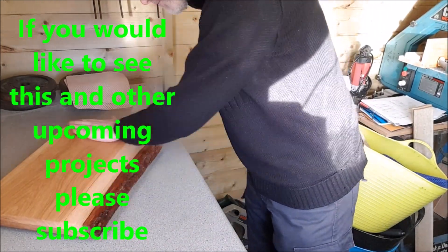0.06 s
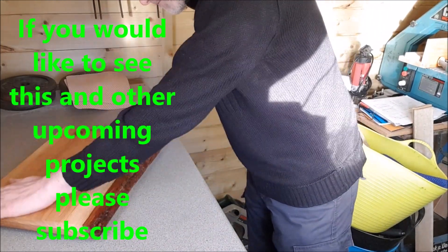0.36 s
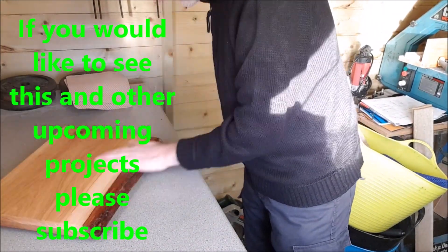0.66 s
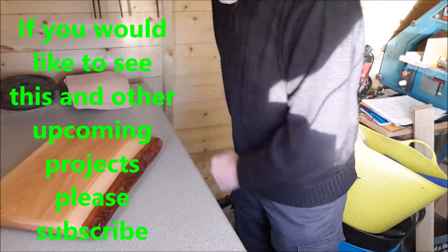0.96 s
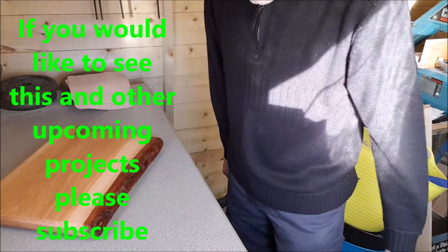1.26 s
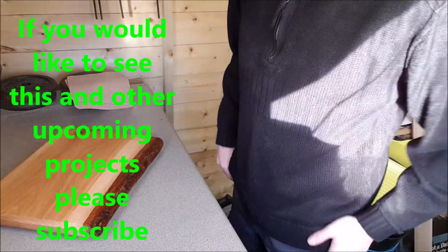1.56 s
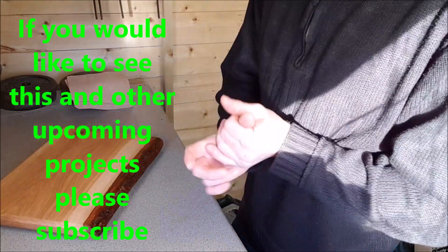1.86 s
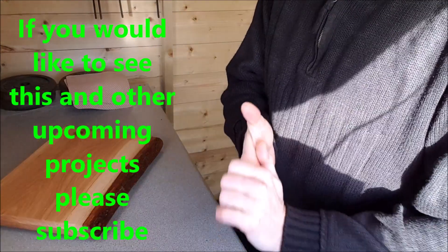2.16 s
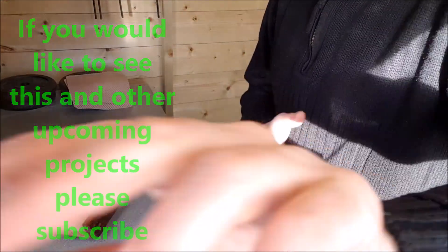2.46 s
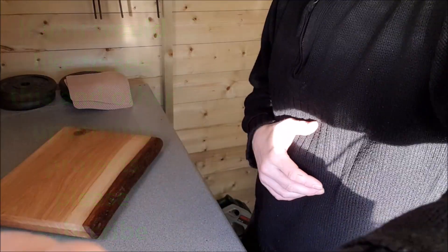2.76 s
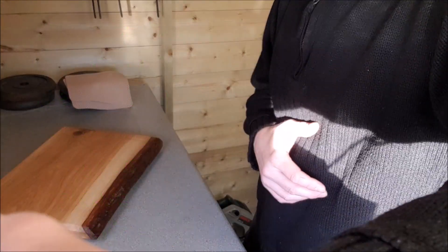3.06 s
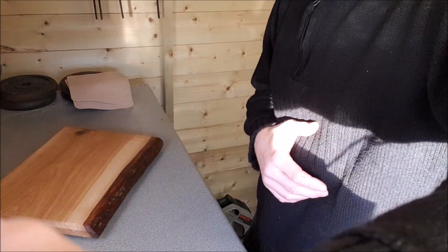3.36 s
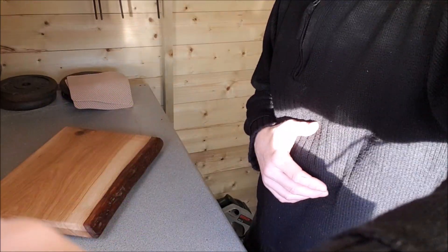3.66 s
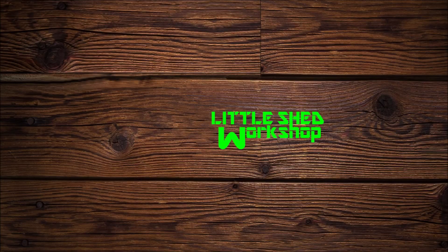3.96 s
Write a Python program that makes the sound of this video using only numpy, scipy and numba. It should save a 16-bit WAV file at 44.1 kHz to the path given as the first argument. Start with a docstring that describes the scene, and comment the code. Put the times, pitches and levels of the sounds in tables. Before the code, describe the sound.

A hand slides over a wooden board, then palms rub together over a low hum.

```python
"""Hands in a small wooden workshop

A hand sweeps out and back over a smooth board, which knocks softly on the bench. The hand pats
and brushes clothing, then the palms rub together, the hollow between them closing as they part.
Each rub is a hiss of many tiny slips. A motor hums throughout; all falls silent just before the end."""
import sys
import numpy as np
from scipy import signal
from scipy.fft import rfft, irfft
from scipy.io import wavfile
from scipy.ndimage import uniform_filter1d
from numba import njit

SR = 44100
rng = np.random.default_rng(int(sys.argv[2]) if len(sys.argv) > 2 else 0)


def unload_wav(signal):
    """Save mono or channel-first audio to the path in sys.argv[1] as 16-bit WAV at rate SR, clipped to [-1, 1]."""
    wavfile.write(
        sys.argv[1],
        SR,
        np.round(np.clip(np.atleast_2d(signal).T, -1, 1) * 32767).astype(np.int16),
    )


N = 176400  # 4 s


def undb(db):
    """Turn decibels into a factor to multiply by."""
    return 10 ** (np.asarray(db) / 20)


def unit(x):
    """Scale to an average (rms) level of 1."""
    return x / np.sqrt(np.mean(x ** 2))


def clock():
    """The time of every sample, in seconds."""
    return np.arange(N) / SR


def colour(x, points):
    """Shape the tone with a curve of (f/Hz, level/dB) points."""
    hz, db = np.array(points, float).T
    bin_hz = np.maximum(np.fft.rfftfreq(N, 1 / SR), 1)
    curve_db = np.interp(np.log(bin_hz), np.log(hz), db)
    return irfft(rfft(x) * undb(curve_db), N)


def keep_side(x, hz, kind):
    """Keep the "low" or the "high" side of a frequency, with a gentle slope."""
    return signal.sosfilt(signal.butter(2, hz, kind, fs=SR, output="sos"), x)


@njit
def band_pass(x, hz, width):
    """Keep a band around a moving frequency; width is a fraction of that frequency."""
    out, band_state, low_state = np.empty(len(x)), 0., 0.
    for i in range(len(x)):
        step = np.tan(np.pi * hz[i] / SR)
        band = (band_state + step * (x[i] - low_state)) / (1 + step * (step + width))
        band_state = 2 * band - band_state
        low_state += 2 * step * band
        out[i] = width * band
    return out


def resonate(x, hz, width):
    """A resonance: band-pass each channel twice, then scale to level 1."""
    hz, width = hz * np.ones(N), float(width)
    return unit(np.array([band_pass(band_pass(channel, hz, width), hz, width) for channel in x]))


def wander(rate_hz):
    """A smooth random curve that strays about 1 either side of zero."""
    hold = int(SR / rate_hz)
    steps = np.repeat(rng.standard_normal(N // hold + 1), hold)
    return 1.3 * uniform_filter1d(uniform_filter1d(steps, hold), hold)[:N]


def level_curve(times, db):
    """Join levels over time, fading quickly before the first and after the last."""
    t = clock()
    outside_s = np.maximum(times[0] - t, 0) + np.maximum(t - times[-1], 0)
    return undb(np.interp(t, times, db)) * np.exp(-outside_s / 0.0084)


def pan(x, left_db):
    """Make the left channel left_db louder than the right."""
    return x * undb(np.array([[left_db], [-left_db]]) / 2)


def friction():
    """Rubbing: tiny slips of uneven size, different on each side, under a fluttering pressure."""
    slips_per_s, spread_db, flutter_db = 12000, 1, 0.76
    slips = (rng.random((2, N)) < slips_per_s / SR) * rng.standard_normal((2, N))
    size = undb(spread_db * np.minimum(rng.exponential(size=N), 4))
    return np.sqrt(2) * unit(slips * size) * undb(flutter_db * wander(70))


def motor_hum():
    """A motor hums with a few low tones, each wavering a little in level and pitch."""
    # the motor's tones: f/Hz, rms level/dB, waver/dB
    tones = [(150.3, -40.5, 0.04), (37.5, -61, 4), (113.3, -67.5, -3.5), (309.5, -71.5, 3), (498.4, -73, 2)]
    out = 0
    for hz, db, waver_db in tones:
        level = np.sqrt(2) * undb(db + waver_db * wander(11))
        phase = 2 * np.pi * (hz * clock() + rng.random()) + 0.04 * waver_db * wander(7.8)
        out = out + level * np.sin(phase)
    return out


def room_air():
    """A dull rush of air, wider between left and right in the treble than in the bass."""
    # tone of the air: f/Hz, level/dB
    air_tone = [(22, -33), (38, -1), (50, -10), (75, 2.5), (120, 0), (190, -2), (240, -8), (310, -9),
                (390, -12.5), (500, -12.5), (700, -20), (1000, -21.5), (1350, -20), (1800, -23.5),
                (2100, -31), (2500, -35.5), (2900, -33.5), (3700, -45), (8500, -47.5), (12500, -44),
                (13600, -55), (15500, -46)]
    # stereo width: f/Hz, level of side against mid/dB
    side_tone = [(40, -12.5), (150, -24), (300, -11), (600, -3.5), (1200, -1), (3000, -0.5)]
    mid = rng.standard_normal(N)
    side = colour(rng.standard_normal(N), side_tone)
    air = unit(colour(np.array([mid + side, mid - side]), air_tone))
    return air * undb(-53 + .5 * wander(4.58))


def wooden_walls(x):
    """Close wooden walls add a short blur of echoes."""
    t60_s, echo_db = 0.07, -4  # t60 is the time to fade by 60 dB
    age = np.arange(SR // 3) / SR
    tail = rng.standard_normal((2, len(age))) * undb(-60 * age / t60_s) * (age > .003)
    tail /= np.sqrt(np.sum(tail ** 2, axis=1, keepdims=True))
    return x + undb(echo_db) * signal.fftconvolve(x, tail, axes=1)[:, :N]


def sleeve_swishes():
    """Wool swishes faintly as the sleeves shift."""
    # swishes: loudest t/s, half length/s, f/Hz, width as a fraction of f, level/dB
    swishes = [(0.97, .05, 10400, .35, -79), (1.12, .07, 6350, .14, -78), (1.13, .04, 8450, .14, -79),
               (1.1, .18, 3000, .2, -78), (2.57, .11, 11200, .28, -77.5)]
    out = 0
    for peak, half_length, hz, width, db in swishes:
        swell = undb(db) / (1 + ((clock() - peak) / half_length) ** 2)
        out = out + resonate(friction(), hz, width) * swell
    return out


def cloth_brush():
    """The hand and knitted sleeves brush the body with a soft hiss."""
    # strength of the brushing: t/s, level/dB
    strokes = [(0.8, -72.5), (0.98, -72), (1.29, -72), (1.36, -77), (1.442, -81), (1.456, -61.5),
               (1.51, -63.5), (1.63, -56), (1.68, -63.5), (1.8, -64), (1.9, -66), (2.35, -74.5),
               (2.41, -81), (2.62, -79.5), (2.85, -96.5), (3.2, -100)]
    # tone of rubbed cloth: f/Hz, level/dB
    cloth_tone = [(1290, -8), (2200, -2), (2470, -4.5), (3260, -3), (5670, -5.5), (6410, -2.5),
                  (8470, -6.5), (11300, -6), (15500, -18)]
    times, db = np.array(strokes).T
    hiss = keep_side(colour(friction(), cloth_tone), 1100, "high")
    return unit(hiss) * level_curve(times, db + 1)


def cloth_pats():
    """A hand lands on cloth, making short dull bursts of noise."""
    # pats: t/s, level/dB, treble cut-off f/Hz
    pats = [(1.266, -50.5, 1900), (1.449, -45, 6000)]
    # tone of a pat: f/Hz, level/dB
    pat_tone = [(200, -19), (480, 4.5), (780, 4), (920, 1.5), (1100, -5), (1350, -2), (1900, -13),
                (2700, -17), (5000, -20.5), (12000, -27)]
    attack_s, t60_s = 0.0078, 0.098
    out = 0
    for start, db, top_hz in pats:
        age = clock() - start
        rise = np.clip(age / attack_s, 0, 1)
        fall = undb(db - 60 * np.maximum(age - attack_s, 0) / t60_s)
        noise = rng.standard_normal(N) + 0.52 * rng.standard_normal((2, N))  # mostly centred
        burst = keep_side(colour(noise, pat_tone), top_hz, "low")
        out = out + unit(burst) * rise * fall
    return out


def board_knocks():
    """The board rocks on the bench and rings, duller for a soft contact; it wobbles, then settles."""
    # knocks: t/s, level/dB, contact cut-off f/Hz, wobble f/Hz, wobble length/s, settling t60/s
    knocks = [(0.0, -35, 156, 129.6, 0.031, 0.1), (0.4238, -31, 526, 132, 0.034, 0.27),
              (0.445, -40.5, 520, 105.4, 0.014, 0.05), (0.8011, -33, 234, 124.7, 0.073, 0.33)]
    # tones the board rings with on the bench: f/Hz, level/dB, t60/s
    modes = [(183.4, -1, 0.23), (237, 2, 0.059), (279, -2.5, 0.15), (501, -3, 0.062), (670, -7, 0.061),
             (823, -7.5, 0.055), (1220, -12, 0.046)]
    attack_s = 0.0033
    out = np.zeros(N)
    for start, db, contact_hz, wobble_hz, wobble_s, settle_t60 in knocks:
        age = np.maximum(clock() - start, 0)
        settle = undb(-60 * np.maximum(age - wobble_s, 0) / settle_t60)
        ring = settle * np.sin(2 * np.pi * wobble_hz * age)
        for hz, mode_db, t60 in modes:
            dulling = np.hypot(1, (hz / contact_hz) ** 2)
            ring += undb(mode_db - 60 * age / t60) * np.sin(2 * np.pi * hz * age) / dulling
        out += undb(db) * ring * (1 - np.exp(-age / attack_s))
    return out


def board_slide():
    """Skin hisses over the wood; resonances come and go as the hand changes how it lies."""
    # strength of the sweep: t/s, level/dB
    sweep = [(0.012, -55), (0.166, -59.5), (0.286, -54), (0.368, -53), (0.446, -61), (0.6, -52.5),
             (0.65, -55.5), (0.67, -49), (0.74, -47), (0.8, -54), (0.828, -83), (0.84, -73)]
    # tone of skin on wood: f/Hz, level/dB
    wood_tone = [(530, -40.5), (900, -21), (978, 3), (1180, 3), (1470, -20), (1690, -2.5), (2220, -7),
                 (2420, -6), (3070, -11), (5240, -8.5), (9630, -8.5), (11400, -7.5), (15500, -15.5)]
    # resonances of board and hand: start t/s, fade-from t/s, end t/s, f/Hz, width/Hz, level/dB
    # most swell first; two early ones enter abruptly at their start, already fading
    resonances = [(0.24, 0.27, .42, 4730, 380, -62), (0.093, 0.027, 0.33, 5300, 320, -65.5),
                  (0.026, .2, 1, 2680, 460, -67), (0, 0.046, 0.23, 9500, 360, -78),
                  (0.078, 0.07, 0.35, 1530, 430, -69.5), (0.532, 0.696, .83, 2450, 570, -52),
                  (.58, .72, .82, 1850, 530, -58), (.64, .72, .82, 4050, 800, -52.5),
                  (0.605, .73, .82, 5500, 1300, -51.5), (.55, 0.71, 0.86, 975, 170, -65.5)]
    times, db = np.array(sweep).T
    hiss = keep_side(colour(friction(), wood_tone), 2030, "high")
    out = unit(hiss) * level_curve(times, db + 1.5)
    slips = friction()
    for start, fade_from, end, hz, width_hz, level_db in resonances:
        strength = np.sin(np.pi / 2 * np.interp(clock(), [start, fade_from, end], [0, 1, 0]))
        out += resonate(slips, hz, width_hz / hz) * strength * undb(level_db)
    return out


def palm_rub():
    """Palm slides on palm with a bright hiss and a lower rasp."""
    # strength of the rubbing: t/s, level/dB, rasp against that level/dB
    strokes = [(1.8, -73, 4.5), (1.842, -51.5, -10.5), (1.884, -55.5, -5.5), (1.92, -50, -9),
               (2.032, -64, -2.5), (2.104, -52, -6), (2.136, -55.5, -10), (2.158, -47, -14),
               (2.236, -47.5, -16.5), (2.254, -50, -12), (2.278, -47.5, -21), (2.314, -61.5, -7),
               (2.33, -79, 9), (2.36, -88, -1)]
    # tone of skin on skin: f/Hz, level/dB
    skin_tone = [(1470, -41), (2500, -31), (3070, -5), (3420, -12.5), (4820, -3), (5280, 1.5), (5790, -0.5),
                 (10600, -1), (15500, -6)]
    times, db, rasp_db = np.array(strokes).T
    hiss = unit(keep_side(colour(friction(), skin_tone), 4100, "high"))
    rasp = resonate(friction(), hz=1840, width=3.5)
    return hiss * level_curve(times, db + 1) + rasp * level_curve(times, db + rasp_db + 2)


def palm_hollow():
    """The hollow between the palms closes, so its resonance rises in pitch."""
    # closings: t/s, length/s, start f/Hz, end f/Hz, level/dB
    closings = [(1.799, 0.051, 1340, 1660, -58), (1.888, 0.043, 2190, 3300, -62),
                (2.162, 0.127, 2400, 5100, -55.5)]
    width, overtone_ratio, overtone_db = .15, 1.33, -1
    out = 0
    for start, length, from_hz, to_hz, db in closings:
        progress = np.clip((clock() - start) / length, 0, 1)
        hz = from_hz * (to_hz / from_hz) ** (progress ** 2)
        slips = friction()
        tone = resonate(slips, hz, width)
        overtone = undb(overtone_db) * resonate(slips, hz * overtone_ratio, 2 * width)
        swell = np.sin(np.pi * progress ** 2.2)  # loudest late in the closing
        out = out + (tone + overtone) * swell * undb(db)
    return out


def scene():
    """Mix the hands and their echo with the motor, air and knocks, all a little to the left."""
    hands = board_slide() + cloth_brush() + palm_rub() + palm_hollow() + cloth_pats() + sleeve_swishes()
    hands = wooden_walls(hands)
    workshop = motor_hum() + room_air() + board_knocks()
    return pan(hands, left_db=2.5) + pan(workshop, left_db=1.53)


def record(dry):
    """Fade quickly to silence just before the end and remove the highest treble."""
    stop_s, fade_s, top_hz = 3.9, 0.025, 15750
    fade = np.clip(1 - (clock() - stop_s) / fade_s, 0, 1)
    low_pass = signal.ellip(10, .2, 80, top_hz, fs=SR, output="sos")
    return signal.sosfilt(low_pass, dry * fade)


dry = scene()
out = record(dry)
unload_wav(out)
```